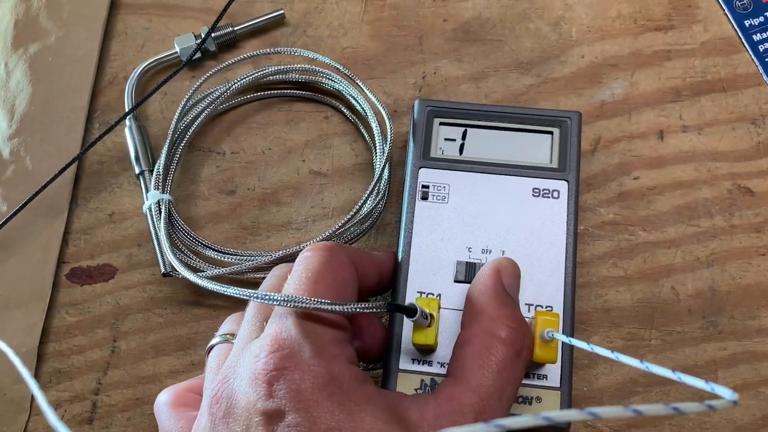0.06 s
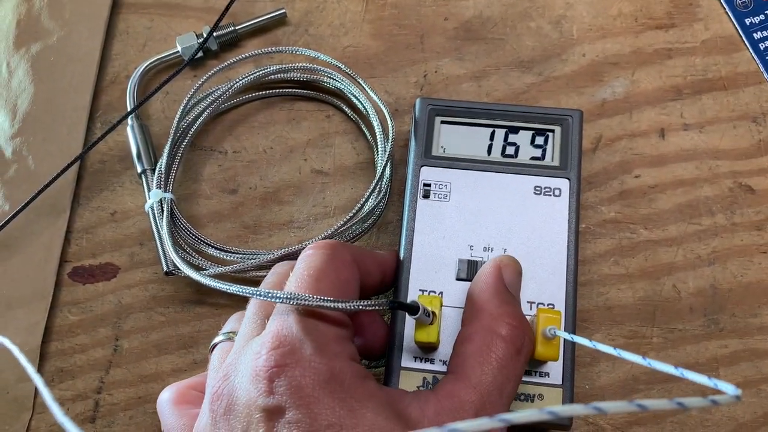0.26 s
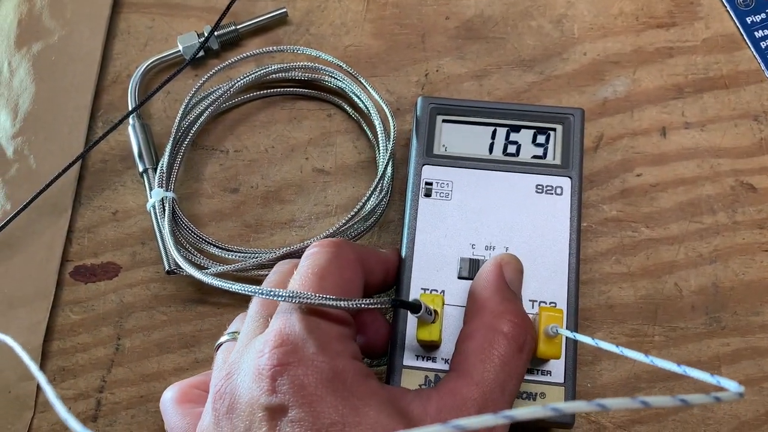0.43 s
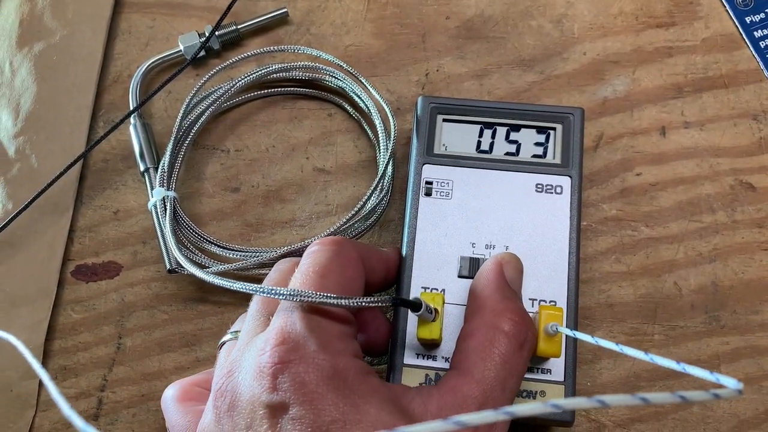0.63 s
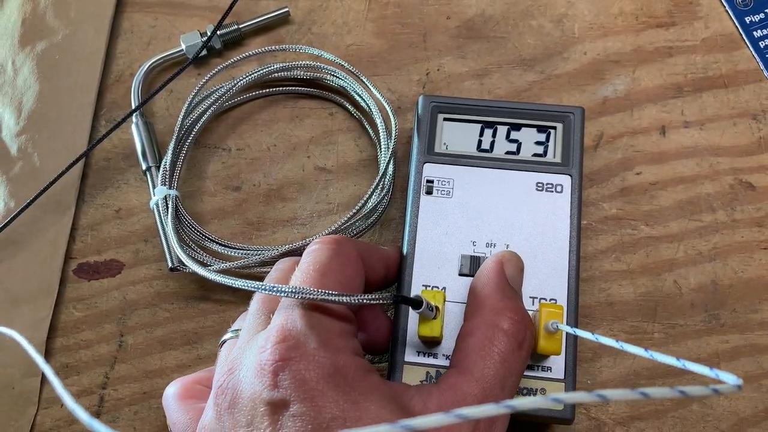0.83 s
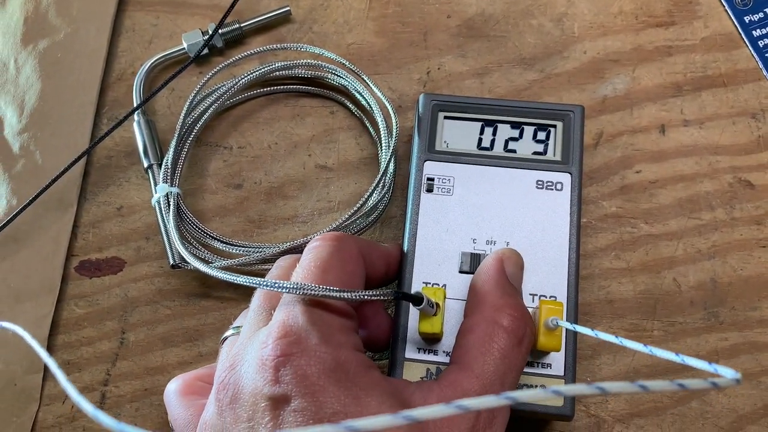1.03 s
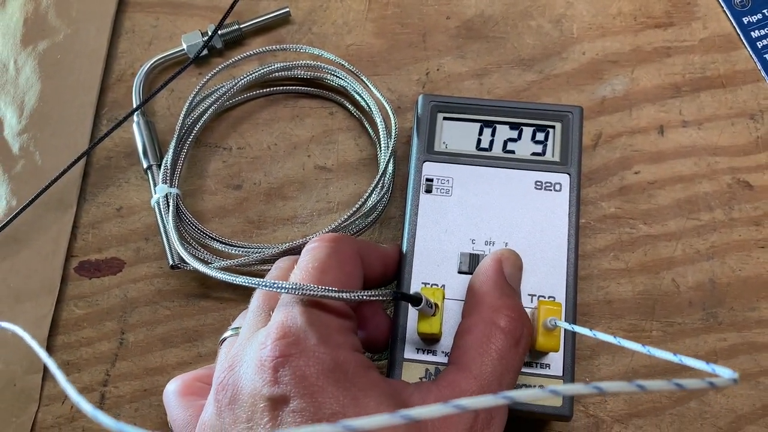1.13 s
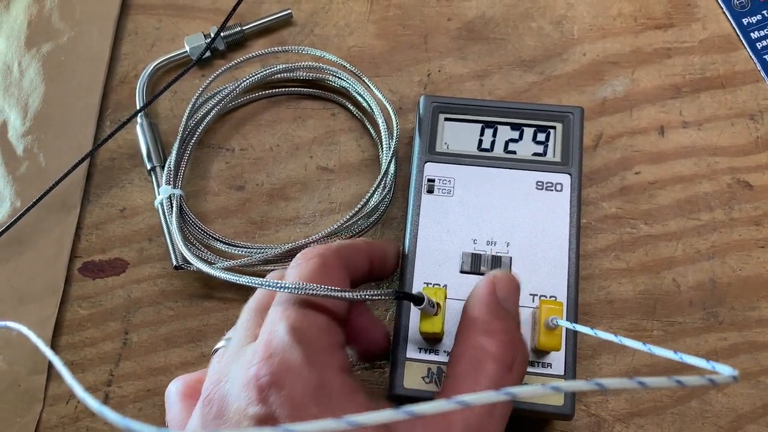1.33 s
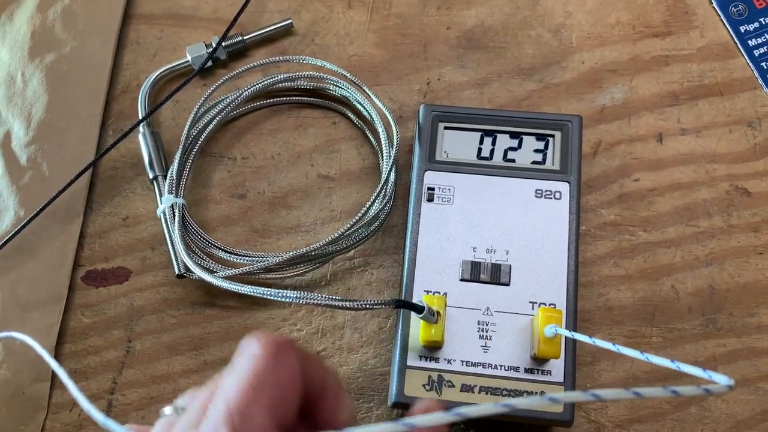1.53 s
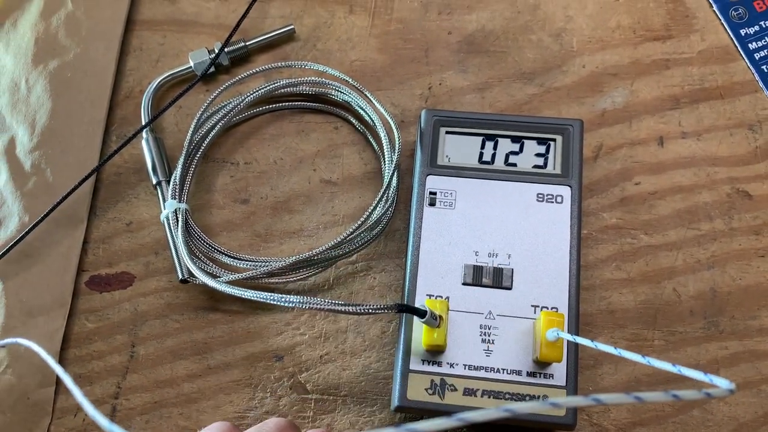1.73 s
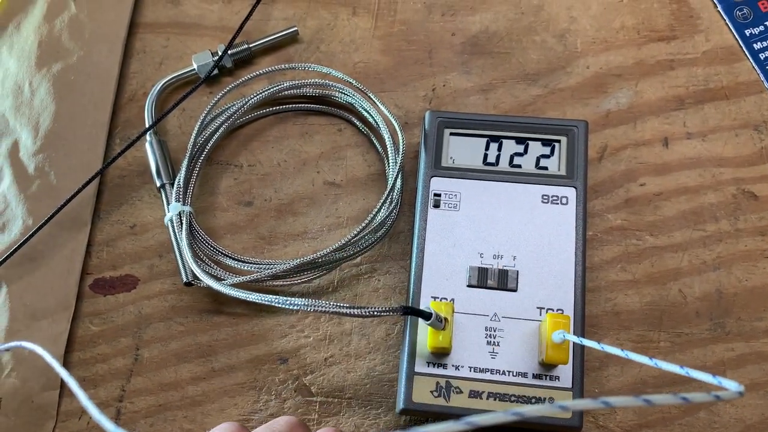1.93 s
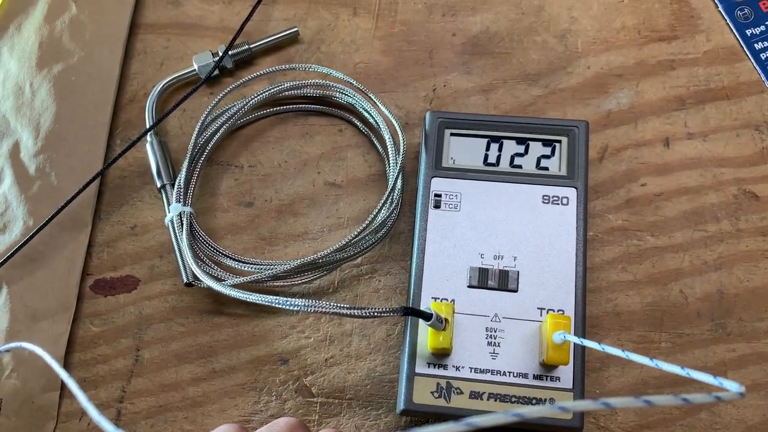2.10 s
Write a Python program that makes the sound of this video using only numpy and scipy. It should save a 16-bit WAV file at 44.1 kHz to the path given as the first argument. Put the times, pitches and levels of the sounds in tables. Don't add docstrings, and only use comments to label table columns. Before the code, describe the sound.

Close stereo microphone at a wooden workbench: one crisp plastic and metal snap, a muffled low thudding just after, then near silence with soft handling taps, a few dull bumps and faint low hum.

```python
import sys
import numpy as np
from scipy import signal
from scipy.fft import rfft, irfft, next_fast_len
from scipy.io import wavfile
from scipy.ndimage import uniform_filter1d, map_coordinates

SR = 44100
rng = np.random.default_rng(int(sys.argv[2]) if len(sys.argv) > 2 else 0)


def transcribe(signal):
    frames = np.atleast_2d(signal).T
    limited = np.clip(frames, -1, 1)
    pcm = np.round(limited * 32767).astype(np.int16)
    wavfile.write(sys.argv[1], SR, pcm)


def voltage_ratio(level):
    return 10 ** (np.asarray(level, float) / 20)


N = 95344

# time in seconds, level in dB.
RUMBLE_SWELLS = [(0.45, -63), (0.541, -66.5), (0.734, -66.5), (0.907, -61.5), (1.167, -64.5),
                 (1.496, -63.5), (1.688, -60), (2.037, -66), (2.16, -66)]
# frequency in Hz, level in dB per Hz.
RUMBLE_COLOUR = [(88, -36), (150, -3), (177, -6.5), (232, 1), (270, -8.5), (324, -10), (383, -16),
                 (450, -11), (800, -25), (1040, -51.5), (1760, -120)]
# time in seconds, level in dB.
TRAFFIC_SWELLS = [(.45, -60), (0.521, -60.5), (.72, -63), (.9, -56.5), (1.05, -60.5), (1.2, -59.5),
                  (1.4, -57), (1.7, -59), (1.82, -56), (2.16, -61)]
# frequency in Hz, level in dB per Hz.
TRAFFIC_COLOUR = [(15, -35), (25, 1.5), (65, 0), (91, -6.5), (123, -4.5), (150, -8), (200, -37.5),
                  (330, -120)]
# frequency in Hz, level in dB per Hz.
AIR_COLOUR = [(410, -37.5), (700, -21), (991, -11.5), (1440, -10), (1560, -18), (2020, -14), (2150, -11.5),
              (2840, -21.5), (7500, -28.5), (9750, -58.5), (16500, -120)]
# frequency in Hz, level in dB per Hz.
HISS_COLOUR = [(3530, -43), (6000, -14.5), (7440, -16.5), (8280, 0), (8650, -2.5), (10300, -3),
               (11400, -8.5), (13100, -6), (13600, -9)]

# frequency in Hz, likeness from 0 to 1.
PORT_LIKENESS = [(60, .9), (500, .75), (1200, .25), (5000, .2), (10000, .5)]
# frequency in Hz, lead of the left port in radians.
PORT_LEAD = [(0, 0), (1210, 1.8), (1890, -3.4), (2330, 1.1), (2580, 1.2), (4130, 3.6), (5000, 8.3),
             (5770, -1.4), (6290, -2.4), (10400, -7.7), (12200, -10.4), (15100, -14.0), (16200, -13.9),
             (16500, -12.8)]
# frequency in Hz, left over right in dB.
PORT_TILT = [(60, -5.5), (180, -1.5), (550, 1.5), (1650, 3.5), (4970, 0.5), (15000, 0.0)]
# frequency in Hz, gain in dB.
MIC_TOP = [(14800, 0), (15400, -14), (16600, -20), (17000, -60)]

# frequency in Hz, t60 in seconds.
ROOM_DECAY = [(150, 0.86), (1000, 1), (3500, 0.68), (6000, 0.55), (9000, 0.41), (15000, 0.062)]
# frequency in Hz, level in dB per Hz.
ROOM_COLOUR = [(250, -32), (500, -2.5), (800, -15.5), (1400, -6.5), (2500, -15), (4300, -13), (5600, -29),
               (8000, -19), (14600, -26)]

# start in seconds, length in seconds, level in dB.
BRUSHES = [(0, .024, -46), (1.234, 0.056, -67), (1.27, 0.084, -72.5), (1.36, 0.077, -73),
           (1.447, 0.14, -84), (1.598, 0.11, -76.5), (1.704, .04, -77)]
# frequency in Hz, level in dB per Hz.
SKIN_COLOUR = [(700, -25.5), (1100, -10.5), (1750, 2), (2500, -6), (3200, -12), (5000, -14.5), (6600, -28),
               (8800, -17), (13000, -32.5), (14200, -102)]
# start in seconds, level in dB, pitch in Hz.
TICKS = [(.765, -58, 450), (1.243, -64, 1750), (1.48, -66, 1400), (1.495, -64, 1020), (1.7055, -59, 750),
         (1.706, -62, 1250), (1.7065, -57, 1900), (1.711, -54, 240), (1.717, -63, 1800)]

# crest in seconds, level in dB, ring
# in Hz, length in seconds.
JOLTS = [(0.159, -27.5, 66.4, 0.02), (0.174, -27, 93, 0.035), (0.197, -29, 78.9, .025),
         (0.205, -26, 156.3, 0.018), (0.226, -25, 100.7, 0.018), (0.242, -27.5, 57.87, .04),
         (0.271, -30, 133.9, 0.01), (0.288, -27.5, 84.8, .03), (0.3, -38.5, 75, .025),
         (.314, -32.5, 167, 0.011), (0.334, -27, 63.6, .045), (0.416, -53.5, 63.7, 0.097),
         (1.578, -52.5, 99, 0.042), (1.62, -41, 80.2, .02), (1.637, -48, 58, .025),
         (1.659, -45.5, 61.55, .022), (1.674, -44.5, 70.2, .022), (1.694, -49.5, 60.3, .025),
         (1.911, -34, 69, 0.029), (1.994, -42.5, 74.8, 0.053),
         (.005, -47, 52.4, 0.053), (0.042, -63, 60, .07), (0.095, -47.5, 68, 0.3),
           (0.174, -37.5, 256, 0.024), (0.2, -31.5, 266, 0.0055), (0.216, -37, 300, 0.0071),
           (0.263, -45.5, 275, .03), (.316, -44, 237.7, 0.049), (1.6119, -40.5, 260, 0.0067),
           (1.616, -47.5, 169.8, 0.0079), (1.251, -51.5, 260, 0.019), (1.278, -50.5, 235, .022),
           (.892, -48.5, 189, .03), (1.365, -52, 73.6, 0.066), (1.429, -49, 75, 0.063),
           (2.145, -50.5, 59.46, 0.025)]

SNAP_S = [
    .0217,
    .0246,
    .0254,
    .0265,
    .0303,
    .0345,
    .041,
]
SNAP_DB = [-29, -10, -15, -13, -21, -26, -33]
# frequency in Hz, level in dB, t60 in seconds.
CASE_MODES = [(877, -9, .018), (987, -8, .016), (1100, -6.5, .016), (1225, -3.5, 0.012),
              (1515.6, -9.5, 0.019), (1695, -8, 0.041), (2044, -7, 0.023), (2510, -13, .025),
              (2795, -12, .025), (3254, -4.5, .025), (3753, -3.5, 0.028), (3960, -4.5, .02),
              (4150, -9.5, .02), (4620, -17, 0.016)]
# frequency in Hz, level in dB, t60 in seconds.
SLIDER_MODES = [(6330, -17.5, .006), (7910, 1.5, 0.01), (8200, -2.5, 0.01), (9420, -8, 0.012),
                (10500, -10, .005), (14700, -11.5, .005), (15950, -4, .003)]
# frequency in Hz, level in dB, t60 in seconds.
BENCH_MODES = [(201.4, -21.5, .065), (260, -20.5, .03), (478, -38.5, .12), (610, -34, .03)]
# frequency in Hz, level in dB per Hz.
CRACK_COLOUR = [(250, -39), (650, -19), (1300, -14.5), (3300, -10), (5000, -21), (7900, -11), (11500, -22),
                (15500, -12.5)]

AIR_DB, HISS_DB = -77.5, -83.5
STILL_S, STILL_DB = 1.72, 1.5
BODY_LEAD = 0.62
GRAIN_DB = 2.5
TICK_T60, TICK_UPPER, TICK_ROOM_DB = 0.022, 1.3, -8
CRACK_DB, CRACK_T60 = 14, 0.003
BENCH_S, BENCH_RISE_S = 0.0275, 0.0045
ROOM_DB = 1
NEAR_DB, NEAR_SHARE = -13, 0.086


def unit(x):
    return x / np.sqrt(np.mean(x ** 2) + 1e-20)


def along(points, hz):
    f, v = np.transpose(points)
    return np.interp(np.log(hz + 1), np.log(f + 1), v)


def over_time(points):
    return np.interp(np.arange(N) / SR, *np.transpose(points))


def wobble(rate):
    knots = rng.standard_normal(int(N * rate / SR) + 4)
    return map_coordinates(knots, [np.arange(N) * rate / SR])


def filtered(x, response):
    m = next_fast_len(N + SR // 2)
    return irfft(rfft(x, m) * response(np.fft.rfftfreq(m, 1 / SR)), m)[..., :N]


def coloured(x, colour):
    return filtered(x, lambda hz: voltage_ratio(along(colour, hz)))


def add(track, s, sound):
    part = track[round(s * SR):][:len(sound)]
    part += sound[:len(part)]


def ring(t, hz, t60, rise_s):
    return np.sin(2 * np.pi * hz * t) * voltage_ratio(-60 * t / t60) * (1 - np.exp(-t / rise_s))


def ports(x, lead):
    return filtered(x, lambda hz: np.exp(np.multiply.outer([.5j, -.5j], lead(hz))))


def air_lead(hz):
    return np.interp(hz, *np.transpose(PORT_LEAD))


def body_lead(hz):
    return BODY_LEAD * (hz > 0)


def rush(colour, patchy_db):
    z = signal.stft(rng.standard_normal((2, N + 512)), nperseg=512)[2]
    field = uniform_filter1d(rng.standard_normal(z.shape[1:]), size=5, axis=0)
    field = uniform_filter1d(field, size=10, axis=1)
    a, b = signal.istft(z * voltage_ratio(patchy_db * unit(field)), nperseg=512)[1][:, :N]

    def share(hz):
        return np.clip(along(PORT_LIKENESS, hz), 0, 1)

    same = ports(filtered(a, lambda hz: np.sqrt(share(hz))), air_lead)
    own = filtered(np.array([b, b[::-1]]), lambda hz: np.sqrt(1 - share(hz)))
    return unit(coloured(same + own, colour))


def room_tone():
    rumble_db = over_time(RUMBLE_SWELLS) + 3.5 + 1.7 * wobble(18)
    rumble = voltage_ratio(rumble_db) * rush(RUMBLE_COLOUR, patchy_db=3.0)
    traffic_db = over_time(TRAFFIC_SWELLS) + 2.5 * wobble(15)
    traffic = voltage_ratio(traffic_db) * rush(TRAFFIC_COLOUR, patchy_db=0.0)
    settled = np.clip((np.arange(N) / SR - STILL_S) * 10, 0, 1)
    air = voltage_ratio(AIR_DB + 0.4 * wobble(1) - STILL_DB * settled) * rush(AIR_COLOUR, patchy_db=2.5)
    hiss = voltage_ratio(HISS_DB) * rush(HISS_COLOUR, patchy_db=2.7)
    return rumble + traffic + air + hiss


def room_answer(x, share=1):
    hz, t, z = signal.stft(rng.standard_normal((2, SR)), SR, nperseg=128)
    t60 = share * along(ROOM_DECAY, hz)[:, None]
    tail = signal.istft(z * voltage_ratio(-60 * t / t60), SR, nperseg=128)[1]
    late = np.pad(x, (SR // 400, 0))[None]
    return signal.fftconvolve(late, tail / np.linalg.norm(tail[0]), axes=1)[:, :N]


def hand():
    shape, ticks, t = np.zeros(N), np.zeros(N), np.arange(SR // 8) / SR
    for s, length, db in BRUSHES:
        add(shape, s, voltage_ratio(db) * np.sin(np.pi * np.clip(t / length, 0, 1) ** 1.2))
    for s, db, hz in TICKS:
        lower = ring(t, hz, TICK_T60, 0.00024)
        upper = ring(t, TICK_UPPER * hz, TICK_T60, 0.001)
        add(ticks, s, voltage_ratio(db) * (lower + 0.5 * upper))
    brushes = shape * voltage_ratio(GRAIN_DB * wobble(140)) * rush(SKIN_COLOUR, patchy_db=2.5)
    return brushes + ports(ticks, body_lead) + voltage_ratio(TICK_ROOM_DB) * room_answer(ticks)


def jolts():
    t, out = np.arange(N) / SR, np.zeros(N)
    for s, db, hz, length in JOLTS:
        swell = np.exp(-8 * ((t - s) / length) ** 2)
        out += voltage_ratio(db) * swell * np.cos(2 * np.pi * hz * (t - s))
    return ports(out, body_lead)


def switch():
    modes, cracks, t = np.zeros(N), np.zeros(N), np.arange(SR // 4) / SR
    for s, db in zip(SNAP_S, SNAP_DB):
        for hz, level, t60 in CASE_MODES + SLIDER_MODES:
            add(modes, s, voltage_ratio(db - 10 + level + rng.normal(0, 2)) * ring(t, hz, t60, 0.00016))
        add(cracks, s, voltage_ratio(db + CRACK_DB - 60 * t / CRACK_T60) * rng.standard_normal(len(t)))
    for hz, db, t60 in BENCH_MODES:
        add(modes, BENCH_S, voltage_ratio(db) * ring(t, hz, t60, BENCH_RISE_S))
    modes = filtered(modes, lambda hz: hz ** 2 / (hz ** 2 + 120 ** 2))
    return modes + coloured(cracks, CRACK_COLOUR)


def switch_in_room():
    snap, landing = switch(), np.zeros(N)
    add(landing, SNAP_S[1], np.ones(1))
    sides = [.5, -.5]
    direct = filtered(ports(snap, air_lead), lambda hz: voltage_ratio(np.multiply.outer(sides, along(PORT_TILT, hz))))
    room = voltage_ratio(ROOM_DB) * room_answer(coloured(landing, ROOM_COLOUR))
    return direct + room + voltage_ratio(NEAR_DB) * room_answer(snap, NEAR_SHARE)


def scene():
    return room_tone() + hand() + jolts() + switch_in_room()


def top_cut(x):
    return signal.sosfilt(signal.butter(12, 16960, fs=SR, output="sos"), x)


def record(dry):
    return top_cut(coloured(dry, MIC_TOP))


dry = scene()
out = record(dry)
transcribe(out)
```